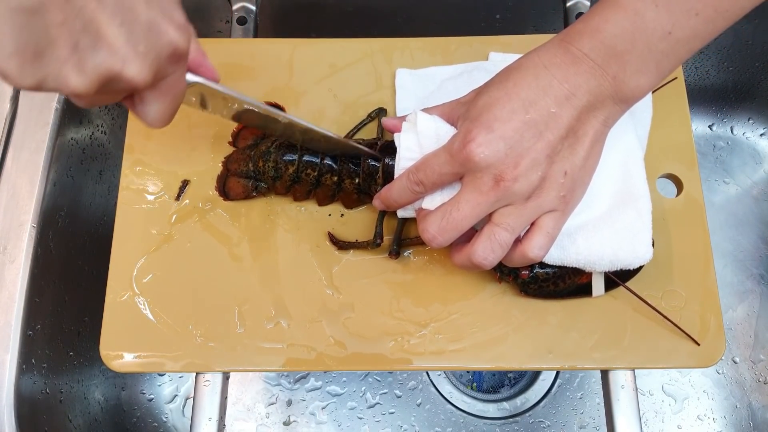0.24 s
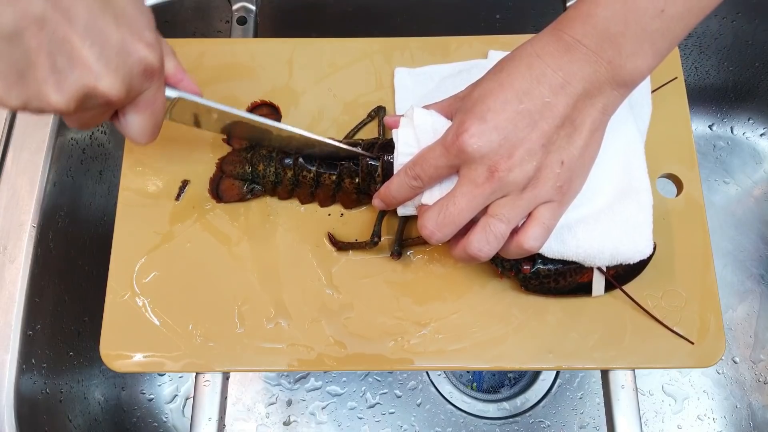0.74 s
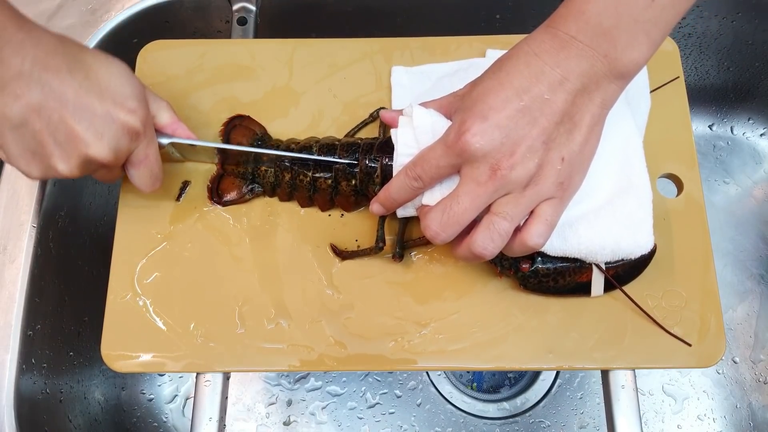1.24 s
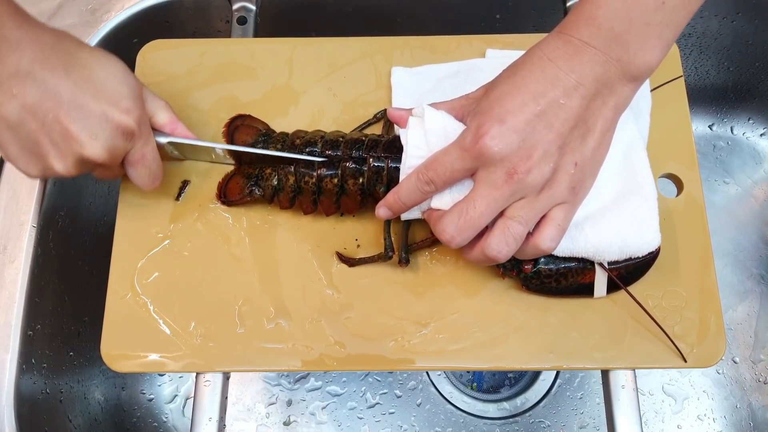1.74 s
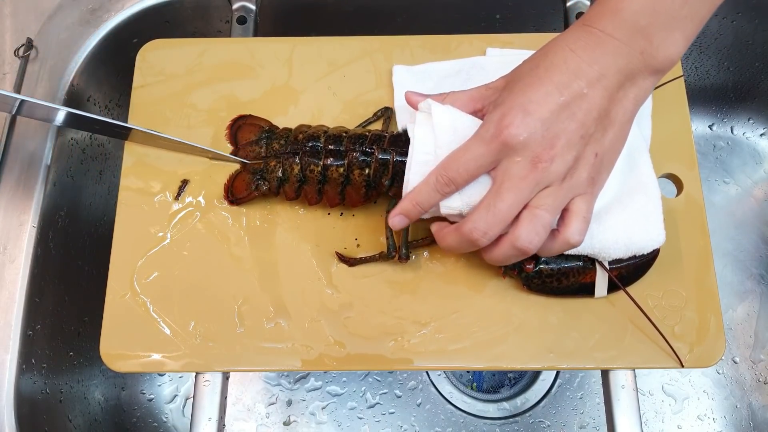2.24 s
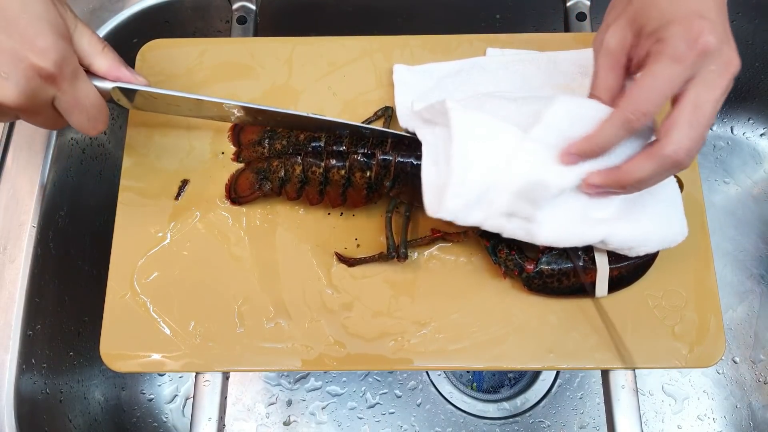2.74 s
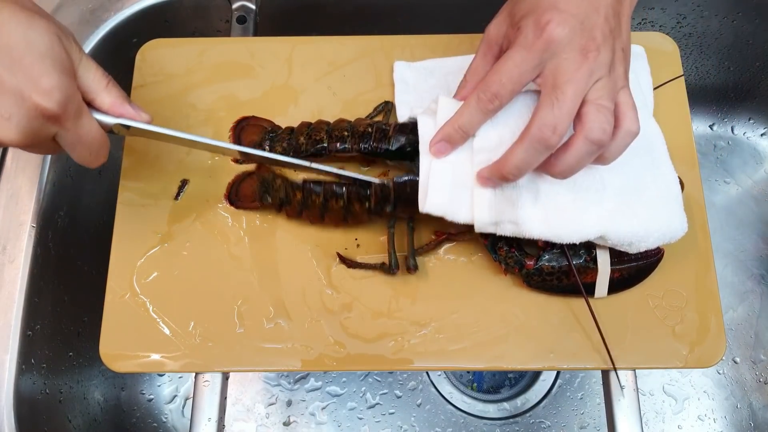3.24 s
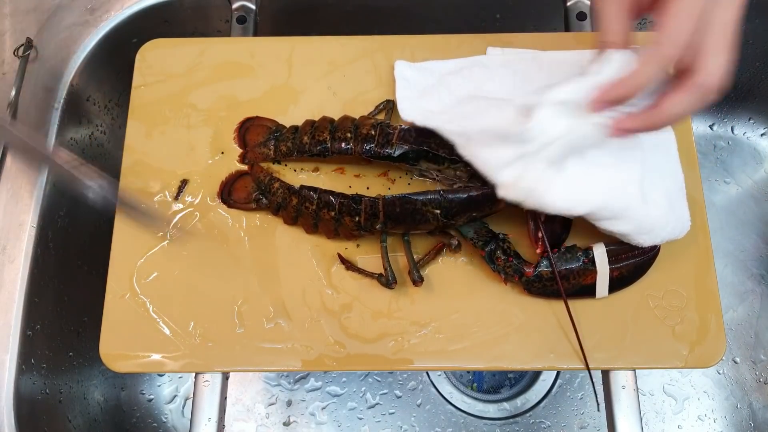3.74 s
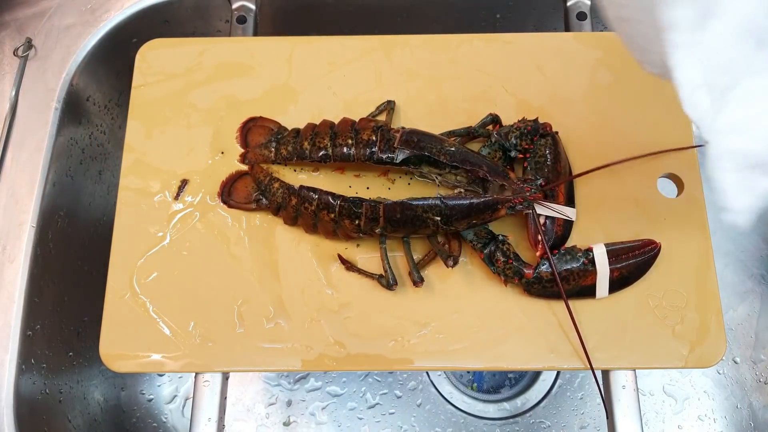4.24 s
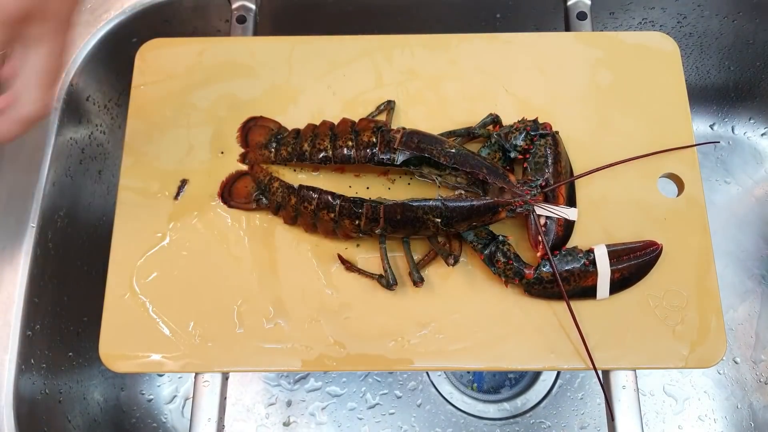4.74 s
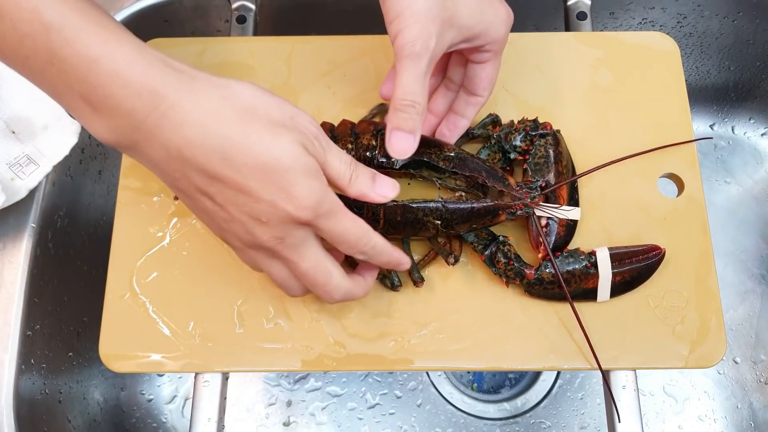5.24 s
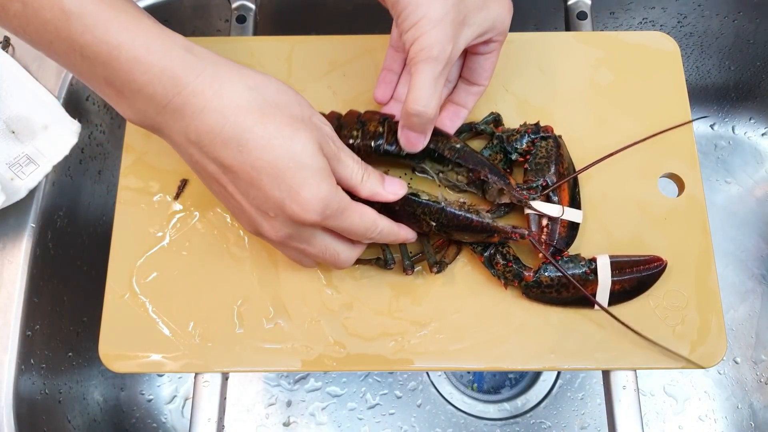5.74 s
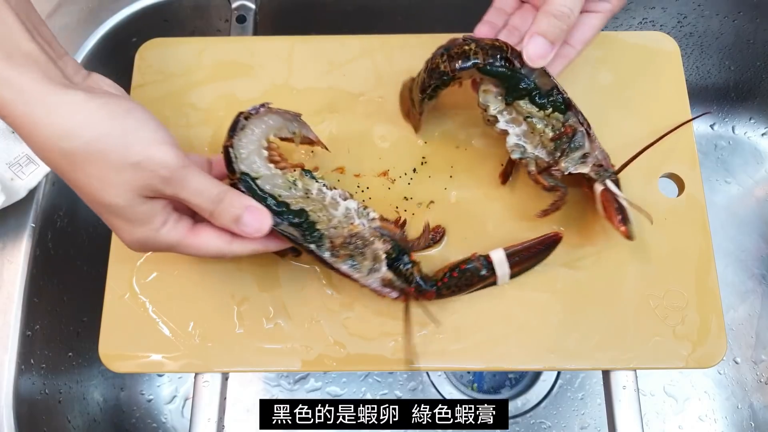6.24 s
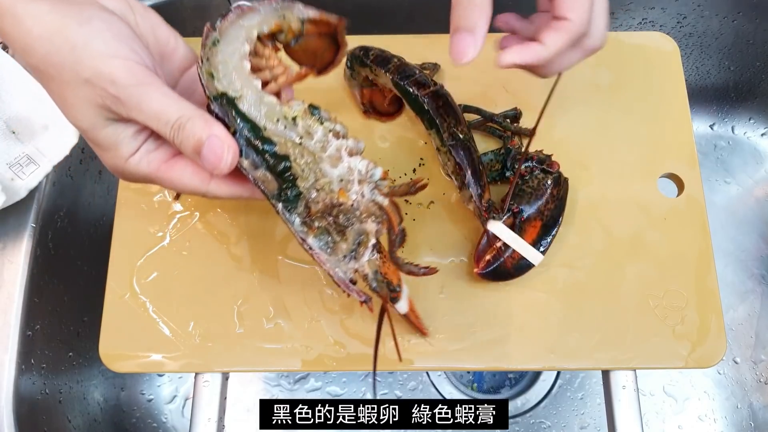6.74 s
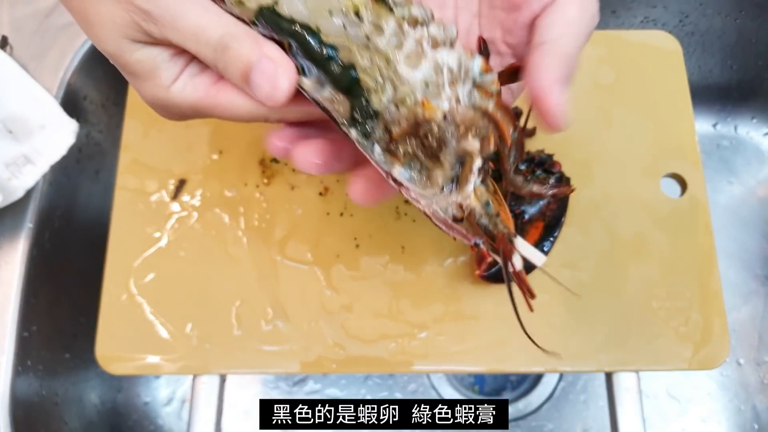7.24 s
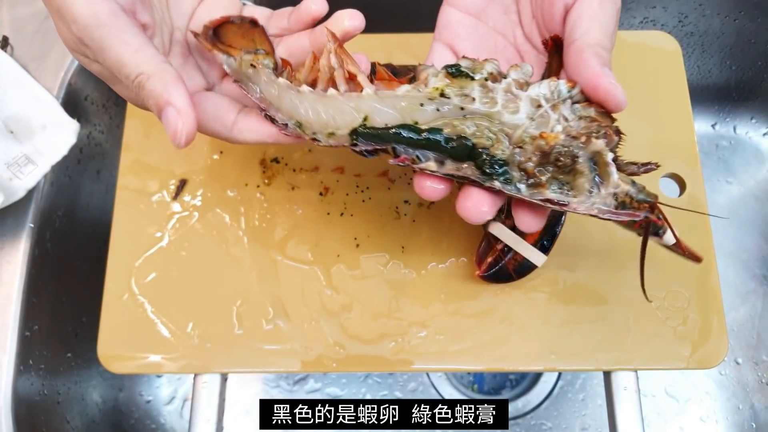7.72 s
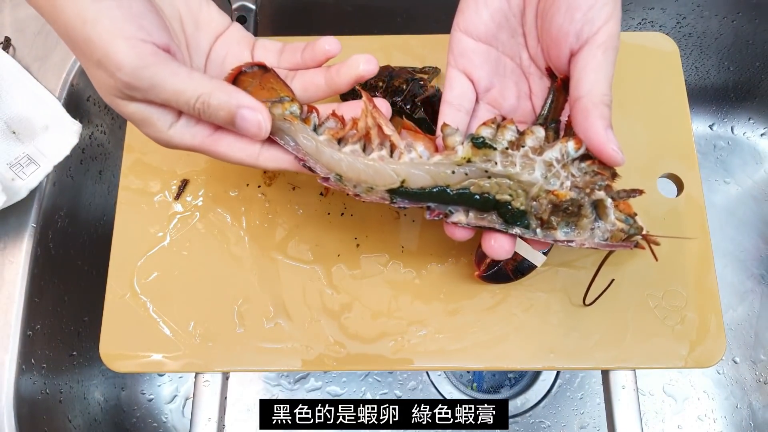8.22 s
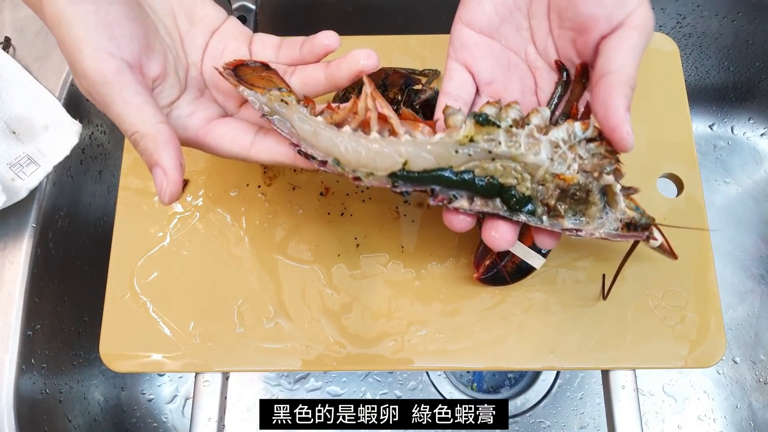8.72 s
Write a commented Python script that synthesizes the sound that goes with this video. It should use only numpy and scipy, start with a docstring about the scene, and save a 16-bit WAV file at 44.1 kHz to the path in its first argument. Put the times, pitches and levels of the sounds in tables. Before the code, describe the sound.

A close stereo pickup in a small tiled kitchen with a faint low appliance hum. From 0.1 to 0.4 seconds a heavy knife bites into a hard shell: a dull board thud, then quick sharp cracks in a rising crunch. A second, louder stroke from 0.8 to 1.05 ends in splintering snaps and a heavy thump, the steel sink booming softly below. Smaller crunches follow at 1.3, 1.45 and 1.7. Between 2.7 and 3.2 come light crackles and thin steely scrapes of the blade. A soft bump at 4.45 leads to a hard, hollow knock at 4.63 with a short rattle. Then it is mostly quiet: a woody tap at 5.85, faint rustling and ticks as wet halves are lifted, soft thuds at 6.6 to 6.75, a low muffled bump at 7.3, and finally nearly bare hum until about 9 seconds.

```python
"""Small tiled kitchen: a heavy knife splits a lobster shell on a plastic board laid over a steel sink.
Fractures, blows and dense crunch are noise bursts and pushes that ring modes of blade, shell, board and sink.
Later the knife is laid down, a towel is dropped and the wet halves are lifted and set back: clumped rustle,
pitched ticks and low thuds. A noise tail answers from the walls; shaped noise gives a faint appliance hum."""
import sys
import numpy as np
from scipy import signal
from scipy.fft import rfft, irfft, next_fast_len
from scipy.io import wavfile

SR = 44100
rng = np.random.default_rng(int(sys.argv[2]) if len(sys.argv) > 2 else 0)


def store_pcm(level_fs):
    """Save levels as 16-bit WAV."""
    pcm = np.round(np.clip(level_fs, -1, 1) * 32767).astype(np.int16)
    wavfile.write(sys.argv[1], SR, np.atleast_2d(pcm).T)


N = 396018

# Forces are arrays (5, 2, N): edge, top, shell body, board, sink; each in stereo.


def undb(db):
    """Decibels to amplitude gain."""
    return 10 ** (np.asarray(db) / 20)


def unit(x):
    """Scale to rms 1."""
    return x / np.sqrt(np.mean(x ** 2))


def shape(x, points, to_gain=undb):
    """Zero-phase filter through (f/Hz, value) points joined on a log-frequency axis."""
    size = next_fast_len(x.shape[-1])
    freq_hz = np.maximum(np.arange(size // 2 + 1) * SR / size, 1)
    f, v = np.transpose(points)
    gain = to_gain(np.interp(np.log(freq_hz), np.log(f), v))
    return irfft(rfft(x, size) * gain, size)[..., :x.shape[-1]]


def stereo_noise(size, alike=None):
    """Mid and side noises mixed to a left-right correlation that depends on frequency."""
    if alike is None:
        # default correlation: f/Hz, correlation
        alike = [(50, 0.99), (250, 0.89), (700, 0.37), (1500, 0.17), (3000, 0.53), (6000, 0.16),
                 (16000, 0.19)]
    mid, side = rng.standard_normal((2, size))
    mid = shape(mid, alike, lambda c: np.sqrt((1 + np.clip(c, 0, 1)) / 2))
    side = shape(side, alike, lambda c: np.sqrt((1 - np.clip(c, 0, 1)) / 2))
    return np.array([mid + side, mid - side])


def balance(x, points):
    """Left-right level difference that depends on frequency."""
    left = shape(x[0], points, lambda db: undb(db / 2))
    right = shape(x[1], points, lambda db: undb(-db / 2))
    return np.array([left, right])


def ring(x, modes):
    """Excite damped modes of unit total energy; neighbours swing in opposite phase."""
    t = np.arange(SR // 2) / SR
    response = 0
    for k, (hz, db, t60_s) in enumerate(modes):
        decay = np.exp(-np.log(1000) * t / t60_s)
        response = response + (-1) ** k * undb(db) * decay * np.sin(2 * np.pi * hz * t)
    response = response / np.sqrt(np.sum(response ** 2))
    return signal.fftconvolve(x, response[None], axes=1)[:, :N]


def kitchen():
    """Room tone: noise coloured as a low hum under faint air, its level swelling slowly by about 1 dB."""
    # hum and air colour: f/Hz, relative level/dB
    colour = [(15, -48), (25, -16.5), (49, -7), (90, -14.5), (124, -5.5), (172, -34), (252, -20.5),
              (399, -31), (687, -33), (1360, -33), (2150, -36.5), (3320, -50.5), (3700, -45), (6300, -47.5),
              (15200, -47), (16500, -56)]
    # f/Hz, left-right correlation
    alike = [(60, 0.55), (130, .8), (290, 0.88), (640, 0.2), (1400, 0.073), (15000, 0.071)]
    # f/Hz, left minus right/dB
    pan = [(60, -2), (400, -5), (1300, -2), (2400, 6.5), (4400, -1.5), (15000, 4)]
    level_db = -61.5
    air = unit(shape(stereo_noise(N, alike), colour))
    swell_db = unit(shape(rng.standard_normal(N), [(1, 0), (3, 0), (10, -120)]))
    return balance(air, pan) * undb(level_db + swell_db)


def grit(stroke, per_s, spread_db, grain_ms, swell_db_per_s):
    """Envelopes of dense grains of very unequal size; random grains kick each body."""
    # fade multipliers: edge, top, body, board, sink
    fade_share = [1.24, 1.3, 1.11, 1.133, 1.2]
    grip_s, grip_db = .03, 19.5  # quick onset
    start, peak, db, fade, *rel_db = stroke
    first = max(int(start * SR), 0)
    t = np.arange(first, min(first + SR, N)) / SR
    swell_db = swell_db_per_s * np.minimum(t - peak, 0)
    rise_db = swell_db - grip_db * np.clip(1 - (t - start) / grip_s, 0, 1)
    fall_db = np.outer(fade_share, fade * np.maximum(t - peak, 0))
    shut = np.clip(np.minimum(start + 1 - t, t - start) / .005, 0, 1)  # 5 ms ramps, 1 s at most

    chance, size = rng.random((2, 5, len(t)))
    clicks = (chance < per_s / SR) * undb(-spread_db * np.log(1 - size))
    clicks[1] = clicks[0] + 0.34 * clicks[1]  # top mostly follows the edge's grains
    grains = signal.lfilter([1], [1, -np.exp(-1000 / (grain_ms * SR))], clicks)
    out = np.zeros((5, N))
    for k, body_db in enumerate([0] + rel_db):
        gain = undb(db + body_db + rise_db - fall_db[k])
        out[k, first:first + len(t)] = unit(grains[k]) * shut * gain
    return out


def friction():
    """Forces of crunch and handling: cutting in coarse grains, handling in fine clumped ones."""
    # blade crunching through the shell, with the board settling and creaking between strokes:
    # start t/s, peak t/s, edge level/dB, fade before fade_share/(dB/s),
    # then relative to edge: top level/dB, body level/dB, board level/dB, sink level/dB
    cut_strokes = [(-0.06, -0.009, -44, 196, 6.5, 0, -3, 8.5), (0.13, 0.408, -37, 151, 4.5, 1.5, 4.5, 7.5),
                   (0.6, 0.757, -68.5, 101.5, -2, 2, 8, 17), (0.77, 1.021, -30.5, 134.5, -2.5, 0.5, 7.5, 3),
                   (1.122, 1.2, -58, 98, -25, -1, 12.5, 20.5), (1.26, 1.333, -37.5, 160, 0, 6, 3, 9),
                   (1.445, 1.436, -49.5, 67.5, -6, 5, 4.5, 14.5), (1.713, 1.734, -51, 109.5, 2, -0.5, 0, 3),
                   (1.895, 2.146, -69.5, 72.5, 1, 0, -13.5, -52)]
    # handling: sliding, hands gripping, and the rattle after the hard knock at 4.63 s; same columns
    rustle_strokes = [(2.689, 2.715, -62.5, 74.07, -2, 9, -3, 4.5),
                      (2.802, 2.868, -55.5, 111.6, 3.5, 4.5, -12.5, -22.5),
                      (2.978, 3.003, -66.5, 30, -1, -1, -7, -5), (3.158, 3.16, -57, 65, 1, 2, -11, -1.5),
                      (3.248, 3.262, -79.5, 135, -21, 19, 33, 25.5),
                      (3.598, 3.689, -76.5, 40.2, -1.5, 2, 8.5, 4.5),
                      (3.944, 3.992, -76, 49.6, 2, 5.5, 8.5, 10),
                      (4.427, 4.452, -62.5, 40.1, -2, 6.5, 19.5, 10.5),
                      (4.527, 4.617, -60, 277.8, 10.5, -8, -19, 11),
                      (4.632, 4.649, -41.5, 141.6, 0.5, 6.5, 21.5, 4.5),
                      (4.68, 4.744, -53.5, 161, 6, -4, 5, 7.5),
                      (5.236, 5.306, -83.5, 68.7, -3.5, 11, 18.5, 16),
                      (5.867, 5.88, -63.5, 94, -0.5, 6, 17.5, 7),
                      (5.89, 6.008, -66, 131, 9, -19.5, -11, -10.5),
                      (6.086, 6.226, -75, 111, 8, -8, 17.5, 9), (6.452, 6.559, -75, 80.6, 3, 7, 16, 26.5),
                      (6.595, 6.605, -73.5, 60, -4.5, 6.5, 18, 18),
                      (6.74, 6.772, -67.5, 135.8, -3, 11, 18, 13.5),
                      (7.256, 7.352, -82, 150, 1, 8.5, 7.5, 22)]
    cut = sum(grit(stroke, per_s=1300., spread_db=1.5, grain_ms=2.8, swell_db_per_s=35)
              for stroke in cut_strokes)
    rustle = sum(grit(stroke, per_s=1200., spread_db=2.5, grain_ms=1.2, swell_db_per_s=37)
                 for stroke in rustle_strokes)
    clumps = unit(shape(rng.standard_normal((5, N)), [(5, 0), (30, 0), (80, -120)]))
    envelopes = cut + rustle * undb(1.2 * clumps)
    return np.array([envelope * stereo_noise(size=N) for envelope in envelopes])


def knocks():
    """Forces of dull blows: a half-sine push on board and sink with a short noise tick at first touch."""
    # t/s, push level/dB, edge relative level/dB, sink relative level/dB, contact/ms
    blow_table = [(0.074, -37, -22, -17, 2.1), (0.153, -15.5, -19.5, -12, 1.67),
                  (0.226, -22.5, -6.5, -9.5, 1.8), (0.953, -21.5, -4.5, -8, 1.4),
                  (0.981, -14.5, -11, -8, 4.7), (1.728, -28, -8, -6.5, 2.82),
                  (3.247, -35.5, -32, -4.5, 1.44), (4.449, -28.5, -29.5, -7, 1.7),
                  (4.489, -39, -35, -16.5, 1.9), (4.628, -7, -18.5, -21, 1.15),
                  (4.654, -13, -29.5, -20.5, 1.9), (5.852, -32, -38, -11.5, 0.47),
                  (6.61, -35, -32, -7.5, 1.7), (6.738, -25.5, -34.5, -9, 1.66)]
    body_db = -15
    force = np.zeros((5, 2, N + 2000))
    t = np.arange(2000) / SR
    for s, db, edge_db, sink_db, contact_ms in blow_table:
        push = np.sin(np.pi * np.clip(t * 1000 / max(contact_ms, .3), 0, 1))
        push = undb(24.5) * push / push.sum()
        tick = stereo_noise(size=2000) * np.exp(-t / 0.0047)
        i = int(s * SR)
        force[:2, :, i:i + 2000] += undb(db + edge_db) * tick
        force[2, :, i:i + 2000] += undb(db + body_db) * tick
        force[3, :, i:i + 2000] += undb(db) * push
        force[4, :, i:i + 2000] += undb(db + sink_db) * push
    return force[:, :, :N]


def board_overtones(blows):
    """Upper board modes, rung by the first-touch ticks of the blows."""
    # f/Hz, relative level/dB, t60/s
    modes = [(854, -2, 0.027), (947, 0.5, .12), (1010.6, -1, 0.053), (1172, -5, 0.084), (1500, -1, 0.046),
             (1700, -5, 0.02), (2120, -13.5, 0.034)]
    return ring(undb(7.0) * blows[2], modes)


def cracks():
    """Forces of shell fractures: noise bursts a few ms long that also kick shell and board."""
    # t/s, edge level/dB, then relative to edge: top level/dB, shell body level/dB, board level/dB
    crack_table = [(0.148, -36, -12, 14, 14), (0.167, -24, 5, 0, 3.5), (0.1816, -21, 9, 3, 2),
                   (0.232, -27, 3.5, -7, -3.5), (0.2696, -17, 5.5, 6, -5), (0.3129, -23.5, 0, 6, -3.5),
                   (0.3285, -27, 14, 6, -5.5), (0.3862, -16.5, 0, 5.5, -4.5), (0.775, -40.5, 7, 6, 4.5),
                   (0.8103, -23, 10.5, 3.5, 1.5), (0.8483, -27, 3, 17, 11.5), (0.878, -12.5, 3, -6, -1),
                   (0.9039, -22.5, 5, 3, -4.5), (0.9451, -19, 8.5, 8.5, 5), (0.9739, -9.5, -16, 4, 0),
                   (1.0149, -13.5, -11, 5, -13.5), (1.263, -40, 6, 11, -13), (1.286, -51, 0, 14, -2.5),
                   (1.307, -37, -14, 25.5, 6), (1.3242, -21, 3, 16, -1), (1.4588, -28.5, -3.5, 10, -18),
                   (1.4818, -52, -15, 3, 4.5), (1.5809, -35.5, -1, 7, 2), (1.617, -40.5, 4.5, 14, -1),
                   (1.719, -29.5, 6, 0.5, -10), (1.967, -57, -2, 23.5, 5.5), (2.1235, -62, -7, -8, -24.5),
                   (2.2231, -54.5, -2, -2.5, -7.5), (2.7113, -47, 1, 16, -20),
                   (2.8337, -51.5, -10, 20, -32), (2.8641, -41, 3, 3, -25), (2.8868, -38, 4, 8, -15),
                   (3.1637, -58.5, -7, 10, -12), (3.1916, -42, 3, 2.5, -31), (4.4399, -41, -6, 2, -2),
                   (6.4631, -66.5, 8, -4, 12), (7.9756, -75, 13.5, 6, -3.5)]
    decay_ms = 2.2
    force = np.zeros((5, 2, N + 2000))
    decay = np.exp(-np.arange(2000) / SR * 1000 / decay_ms)
    for s, db, top_db, body_db, board_db in crack_table:
        burst = stereo_noise(size=2000) * decay
        burst *= np.sqrt(np.sum(decay ** 2) / np.sum(burst ** 2))
        gain = undb(db + np.array([0, top_db, body_db, board_db]))
        i = int(s * SR)
        force[:3, :, i:i + 2000] += gain[:3, None, None] * burst
        # the released load shoves the board one way
        force[3, :, i:i + 2000] += gain[3] * decay / np.sqrt(decay_ms)
    return force[:, :, :N]


def edge_snap(edge_force):
    """Brittle edge: the force heard directly as coloured noise."""
    # f/Hz, gain/dB
    snap_gain = [(1760, -30), (3000, -0.5), (3270, 0.5), (5740, -1.5), (7800, -3), (10000, -5), (14900, -3),
                 (16200, -20), (16500, -25.5)]
    colour = [(1500, -59.5)] + list(snap_gain)
    return undb(10.5) * shape(edge_force, colour)


def blade_ring(edge_force):
    """Steel blade modes, driven by a share of the edge force that varies with how freely it rings."""
    # f/Hz, relative level/dB, t60/s
    modes = [(4500, -4, .08), (5800, -4, .08), (7100, -4, .15), (8600, -3, .1), (11100, -5, .1),
             (12650, -2, .12), (14500, -4, .12), (15300, -4, .1)]
    # t/s, share of the edge force/dB
    freedom = [(0, -18.5), (1.9, -23.5), (2.05, -2), (3.3, -1.5), (3.399, -46), (9, -45)]
    s, free_db = np.transpose(freedom)
    return ring(edge_force * undb(np.interp(np.arange(N) / SR, s, free_db)), modes)


def bodies(edge, top, body, board, sink):
    """Forces sound in the brittle edge, blade, shell, board and sink."""
    # modes of each body: f/Hz, relative level/dB, t60/s
    shell_modes = [(903, -7, 0.031), (1114, -2.5, 0.024), (1333, 0.5, 0.013), (1775, 5, 0.0054),
                   (2006, -0.5, 0.022), (2205, 3, 0.0071), (2840, 1, 0.0051), (3156, -4.5, 0.0067)]
    board_modes = [(172.8, -7, 0.11), (250, 1, 0.054), (350, 2.5, 0.043), (426.4, -4, 0.097),
                   (542, 1.5, 0.036), (621.4, -9.5, 0.13), (626, -12.5, 0.055), (788.7, -9.5, 0.06)]
    sink_modes = [(43.6, -2, 0.081), (59.4, 6, 0.11), (99.5, -6, 0.35), (112, -5, 0.2), (142, -4, 0.17)]
    sink_lag_s = 0.045  # the heavy sink answers late
    edge_force = shape(edge, [(7000, 0), (10000, -30)]) + shape(top, [(5000, -30), (7500, 0)])
    late_sink = np.roll(sink, int(sink_lag_s * SR), axis=1)
    sharp = edge_snap(edge_force) + blade_ring(edge_force)
    return sharp + ring(body, shell_modes) + ring(board, board_modes) + ring(late_sink, sink_modes)


def ticks():
    """Narrow-band noise under damped envelopes: pitched ticks and low thuds."""
    # some give tone to the blows at the same moments: t/s, level/dB, f/Hz, t60/s
    tick_table = [(1.876, -47.5, 1500, .05), (2.14, -53.5, 2900, .06), (2.982, -42, 4750, 0.022),
                  (3.62, -69.5, 4020, 0.13), (3.975, -55.5, 5650, 0.033), (5.251, -59, 1288, 0.071),
                  (6.108, -59, 3770, 0.034), (6.199, -58.5, 7680, 0.084), (6.874, -57.5, 3760, 0.044),
                  (5.853, -41.5, 968, 0.33), (5.86, -39.5, 536, 0.28), (6.198, -48.5, 406, 0.39),
                  (6.614, -44, 906, 0.17), (7.273, -61, 963, 0.082), (7.297, -43, 107, 0.31),
                  (7.347, -61, 4490, 0.33), (7.375, -58, 1375, 0.048)]
    out = np.zeros((2, N + 12000))
    t = np.arange(12000) / SR
    for s, db, hz, t60_s in tick_table:
        band = [(hz / 2, -80), (hz / 1.15, 0), (hz * 1.132, 0), (hz * 2, -80)]
        build_up = np.clip(t * hz / 2, 0, 1)  # two cycles
        swing = build_up * np.exp(-np.log(1000) * t / t60_s)
        i = int(s * SR)
        out[:, i:i + 12000] += undb(db) * unit(shape(stereo_noise(size=12000), band)) * swing
    return out[:, :N]


def room(x):
    """Tiled walls: a noise tail that dies at its own rate in each octave."""
    # f/Hz, t60/s
    decay_times = [(100, 0.1), (400, 0.33), (1100, 0.24), (3000, 0.25), (8000, 0.28), (16000, 0.25)]
    level_db = -4.5
    t = np.arange(int(.7 * SR)) / SR
    f, t60_s = np.transpose(decay_times)
    noise, tail = stereo_noise(size=len(t)), 0
    for hz in 60 * 2. ** np.arange(9):
        band = shape(noise, [(hz / 2, 0), (hz, 1), (hz * 2, 0)], lambda v: v)
        band_t60_s = np.interp(np.log(hz), np.log(f), t60_s)
        tail = tail + band * np.exp(-np.log(1000) * t / band_t60_s)
    tail = tail * np.clip((t - .003) / 0.0013, 0, 1)  # the first walls answer after 3 ms
    tail = tail / np.sqrt(np.mean(np.sum(tail ** 2, axis=1)))
    mono = x.mean(axis=0, keepdims=True)
    return undb(level_db) * signal.fftconvolve(mono, tail, axes=1)[:, :N]


def scene():
    """Knife work and handling in the room, over the kitchen tone."""
    tone = kitchen()
    rubbing = friction()
    blows = knocks()
    forces = rubbing + blows + cracks()
    near = bodies(*forces) + board_overtones(blows) + ticks()
    return near + room(near) + tone


def record(dry):
    """Two ports differing in colour; the recorder cuts deep bass, rounds peaks and cuts the top."""
    # f/Hz, left minus right/dB
    port_balance = [(60, -4.5), (110, -4.5), (200, -3.5), (380, -1.5), (700, -3.5), (1290, -3),
                    (2380, -0.5), (4400, -1.0), (8120, -5), (15000, -5.5)]
    bass_cut_hz, top_hz = 45, 16200
    high_pass = signal.butter(3, bass_cut_hz, "high", fs=SR, output="sos")
    low_pass = signal.ellip(12, .2, 90, top_hz, fs=SR, output="sos")
    ports = signal.sosfilt(high_pass, balance(dry, port_balance))
    return signal.sosfilt(low_pass, np.tanh(ports))


dry = scene()
out = record(dry)
store_pcm(out)
```